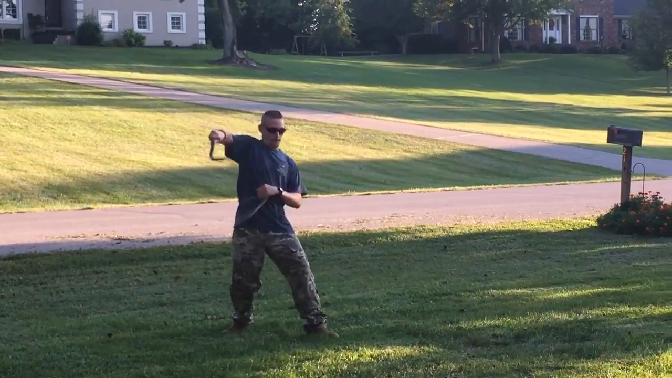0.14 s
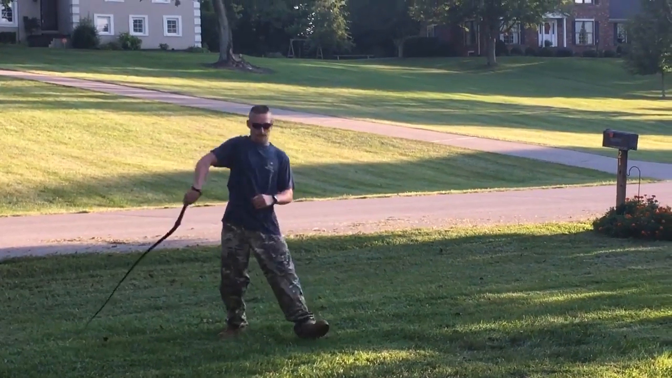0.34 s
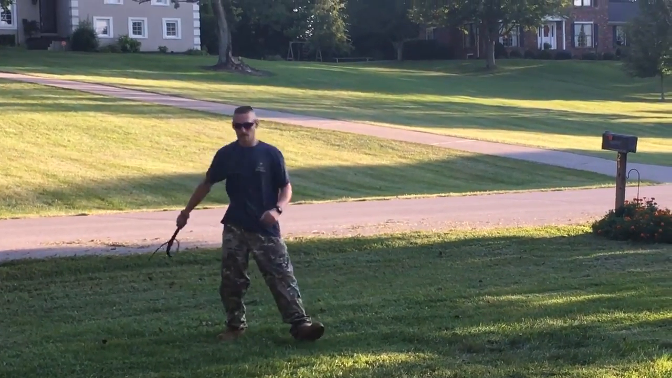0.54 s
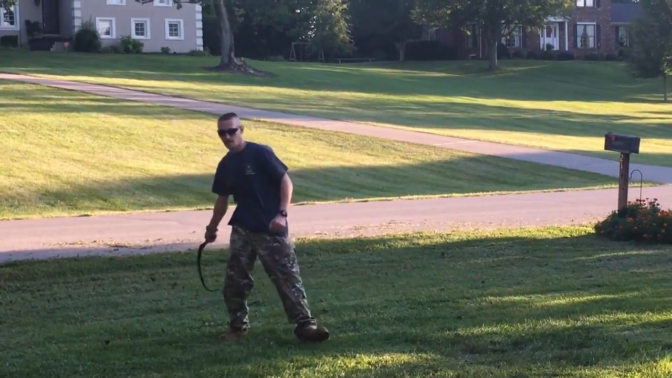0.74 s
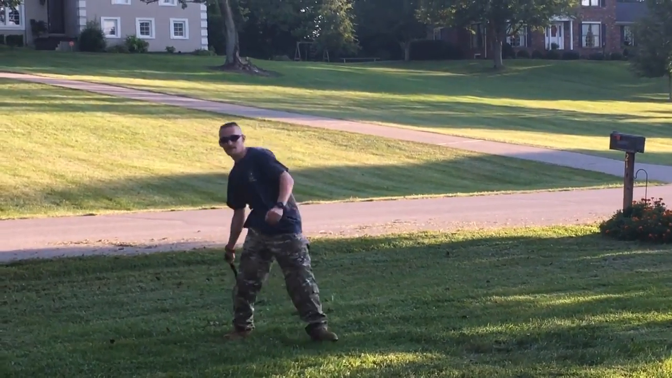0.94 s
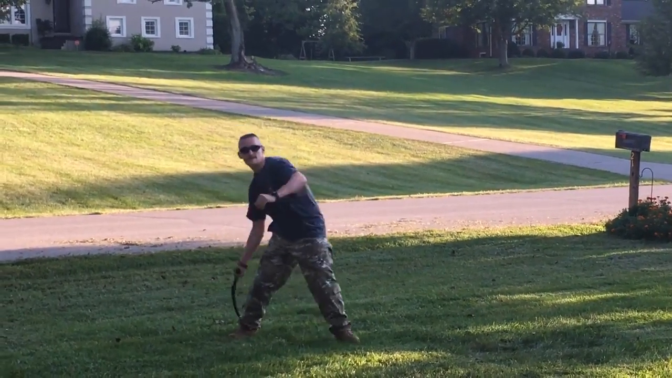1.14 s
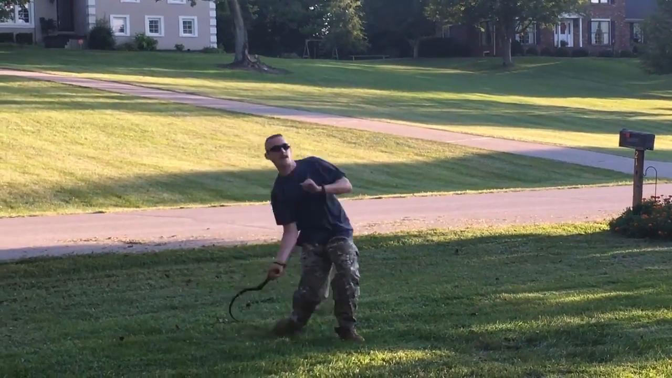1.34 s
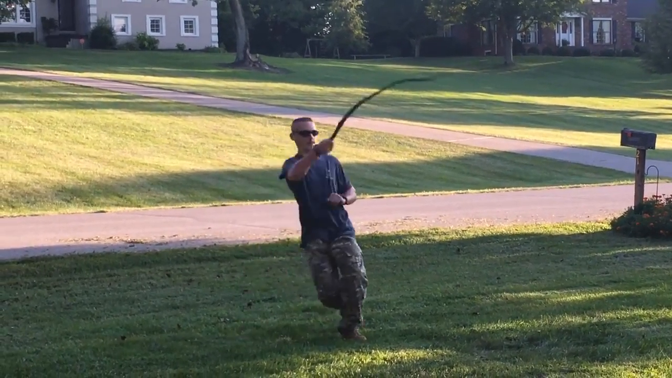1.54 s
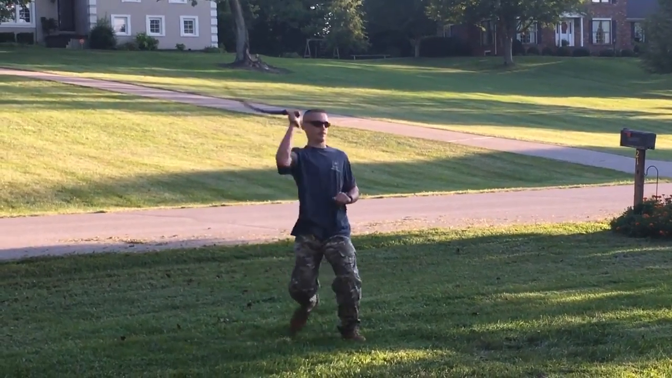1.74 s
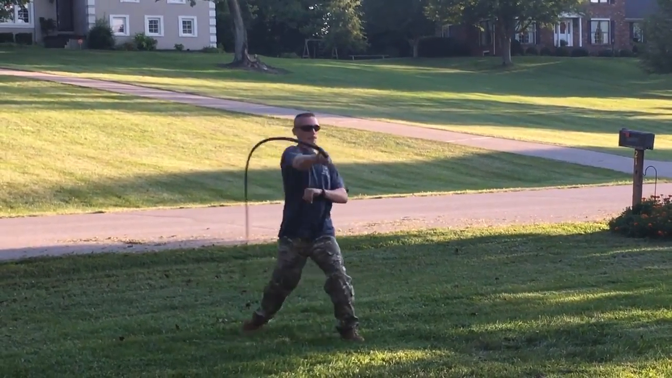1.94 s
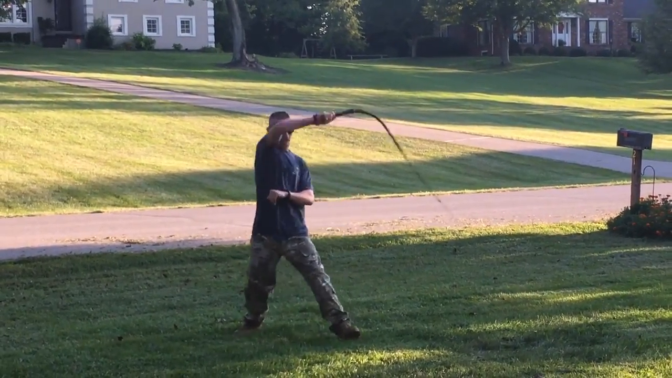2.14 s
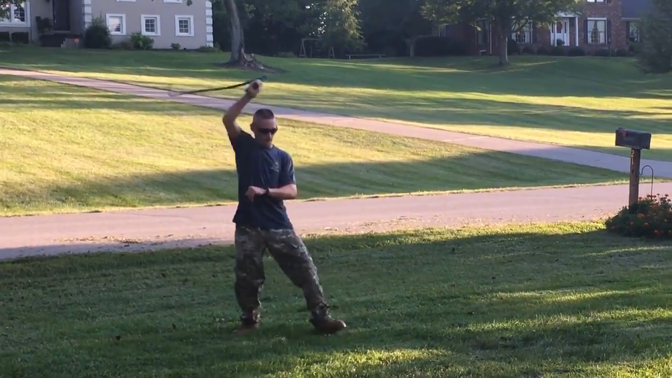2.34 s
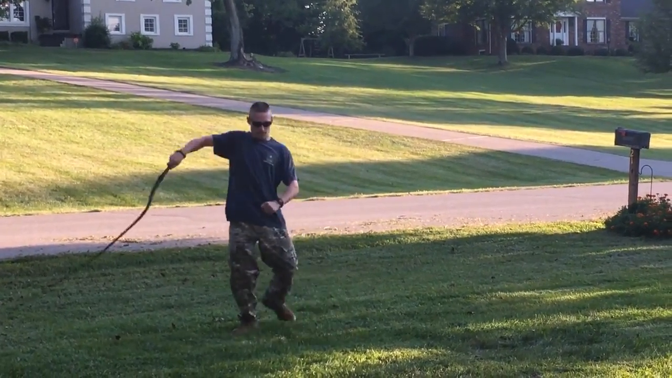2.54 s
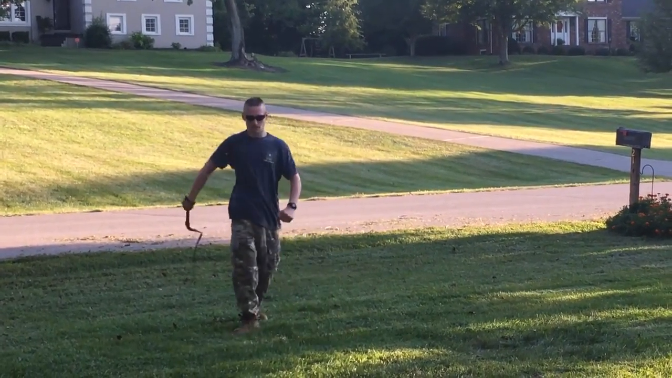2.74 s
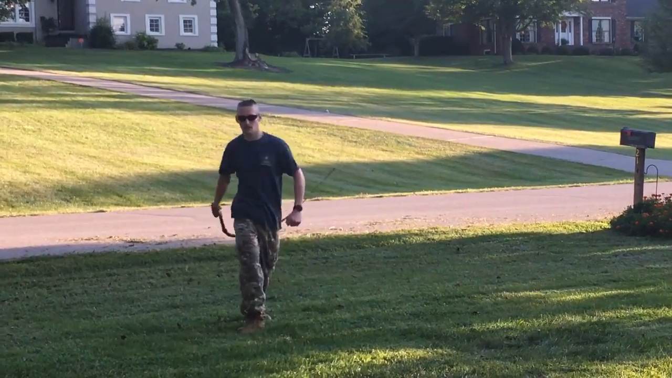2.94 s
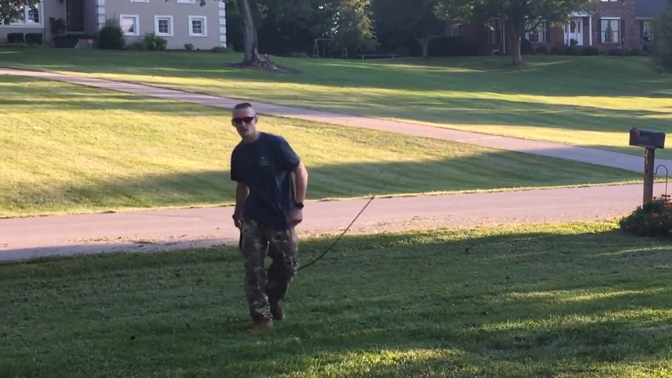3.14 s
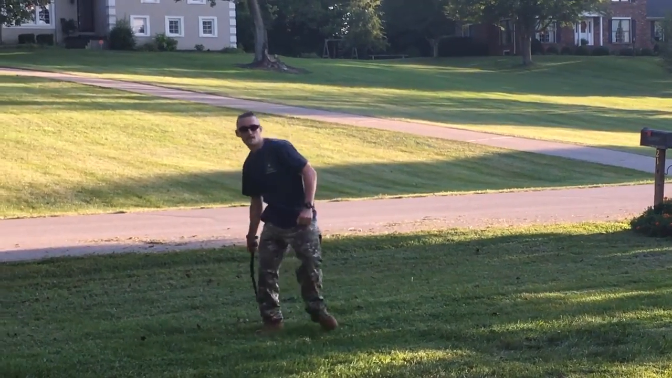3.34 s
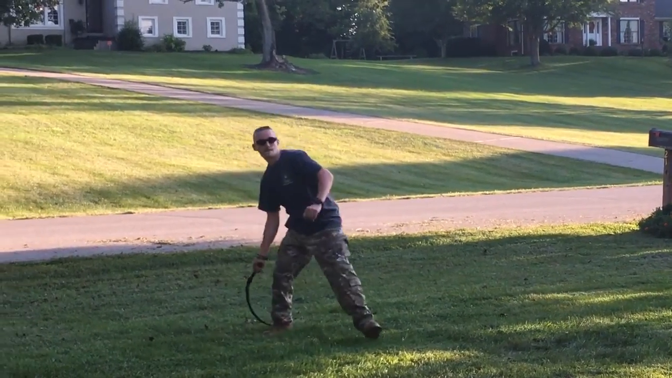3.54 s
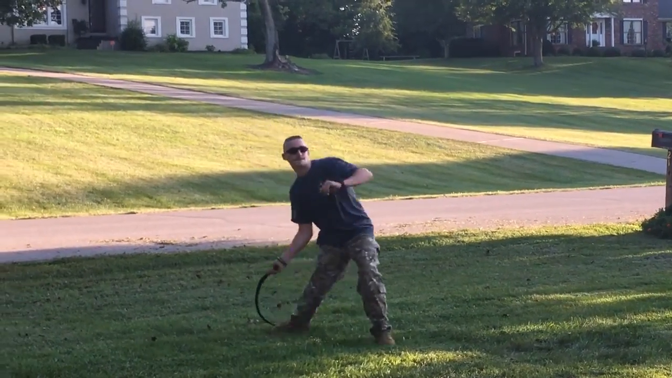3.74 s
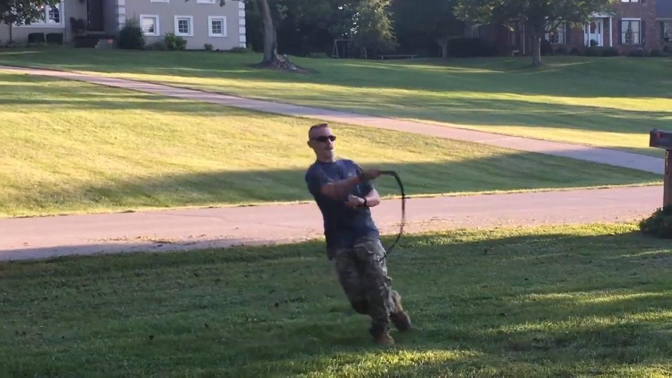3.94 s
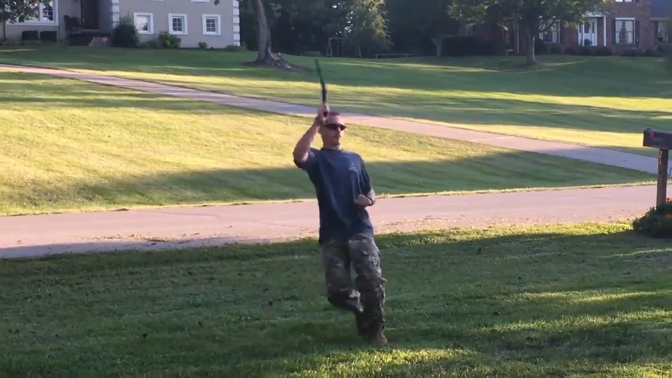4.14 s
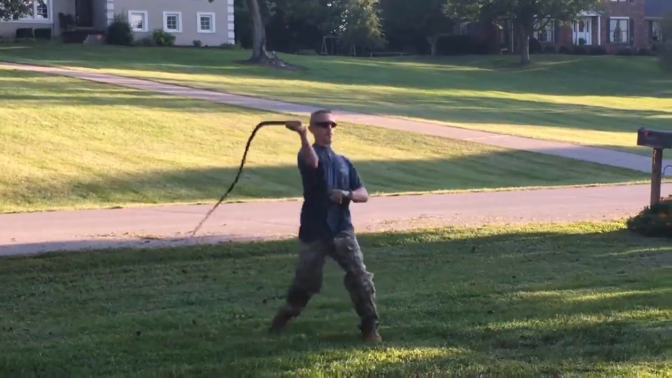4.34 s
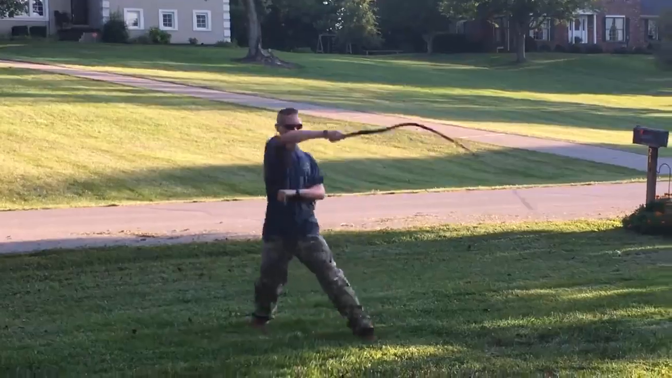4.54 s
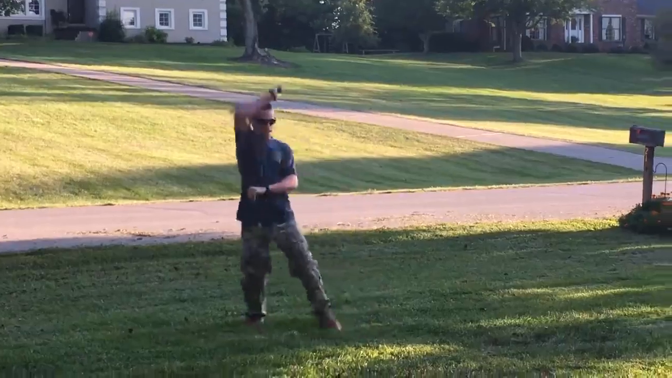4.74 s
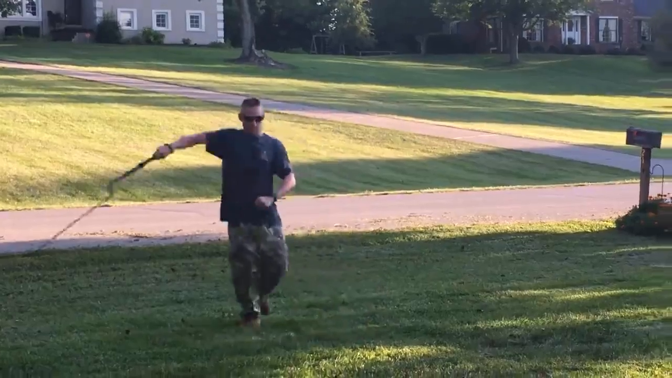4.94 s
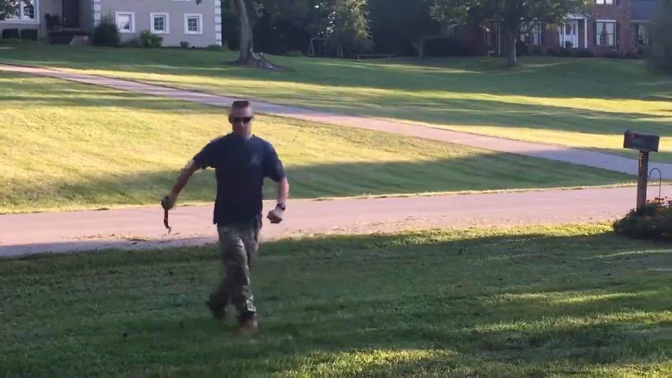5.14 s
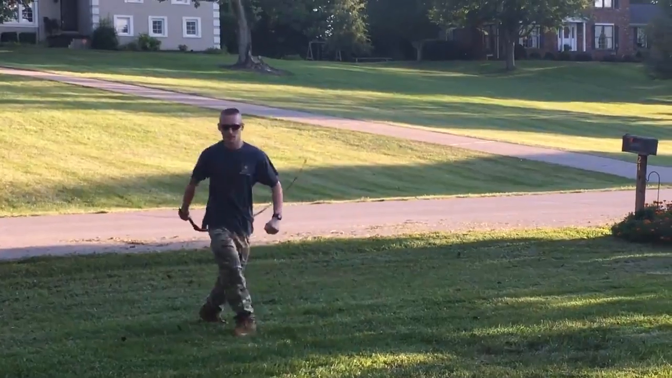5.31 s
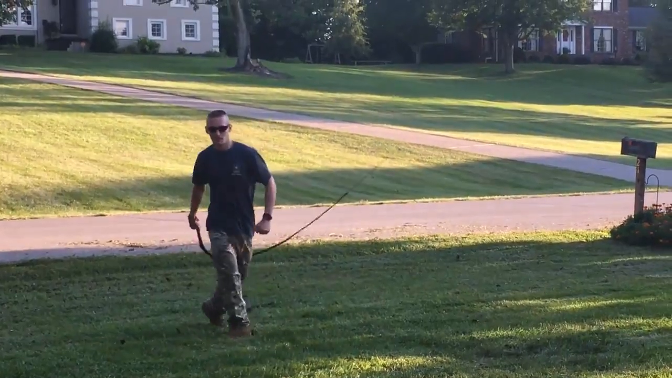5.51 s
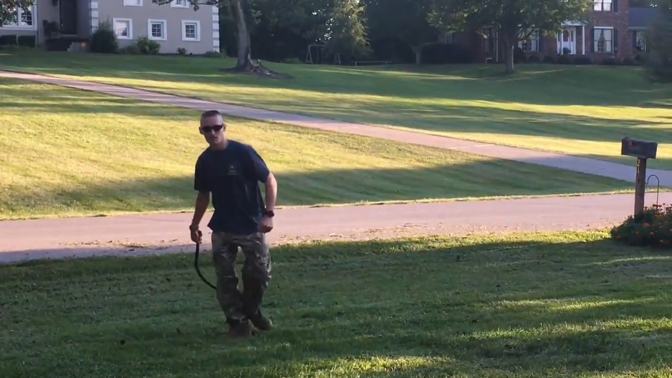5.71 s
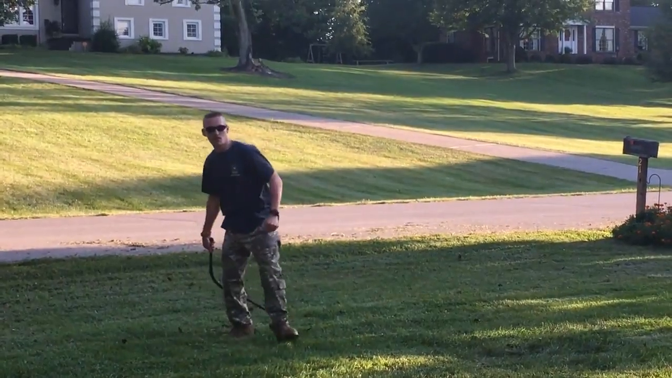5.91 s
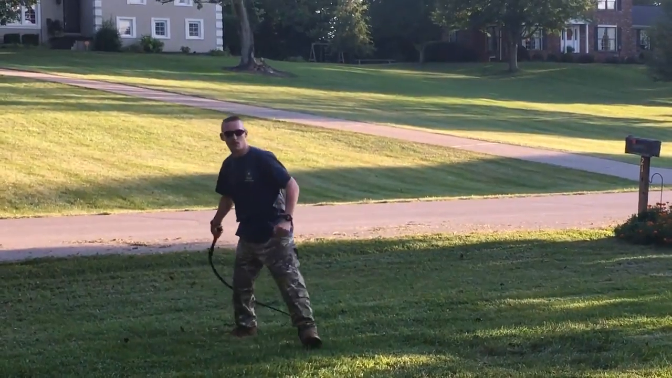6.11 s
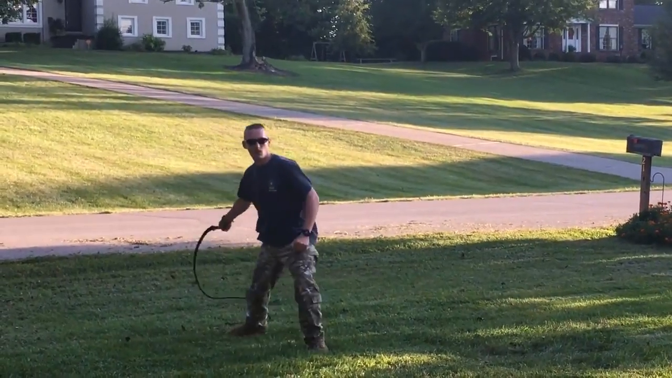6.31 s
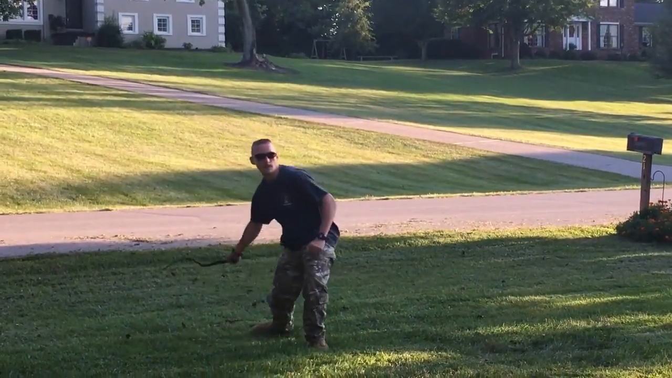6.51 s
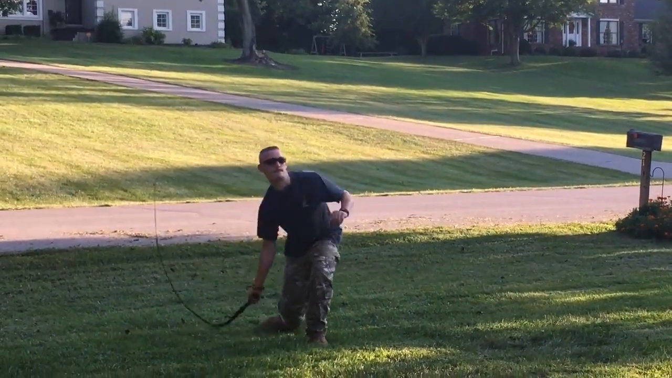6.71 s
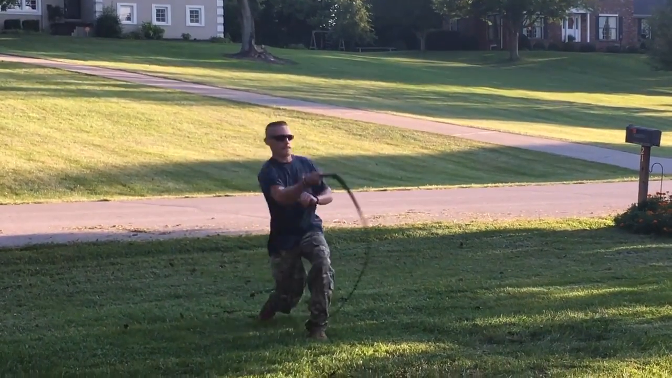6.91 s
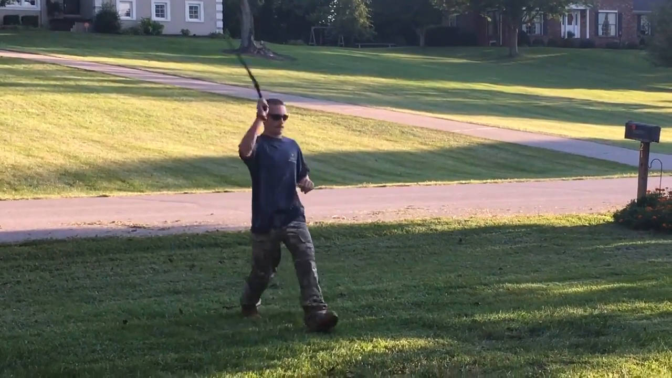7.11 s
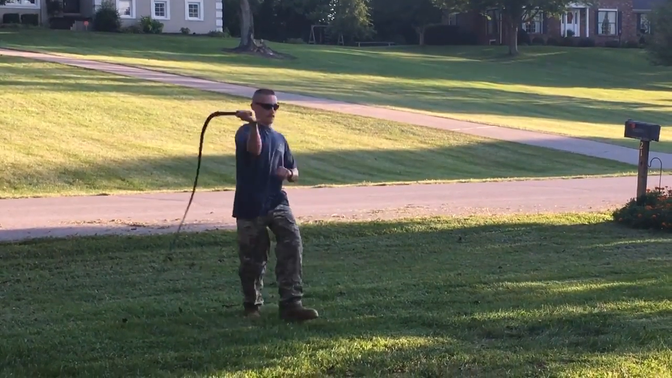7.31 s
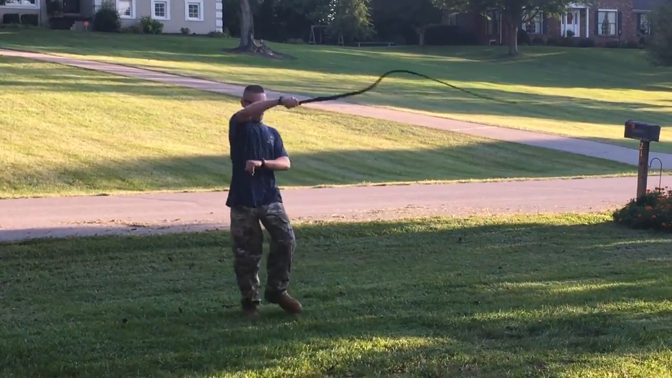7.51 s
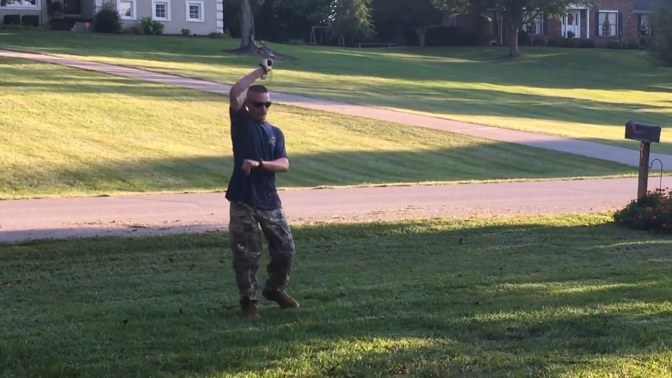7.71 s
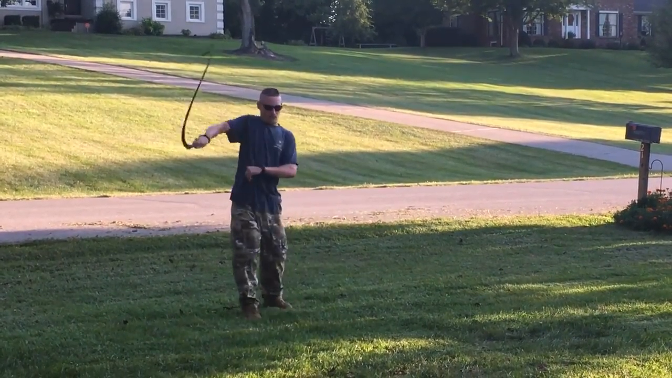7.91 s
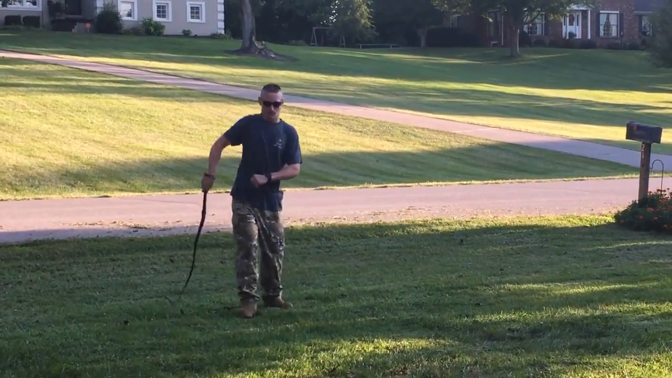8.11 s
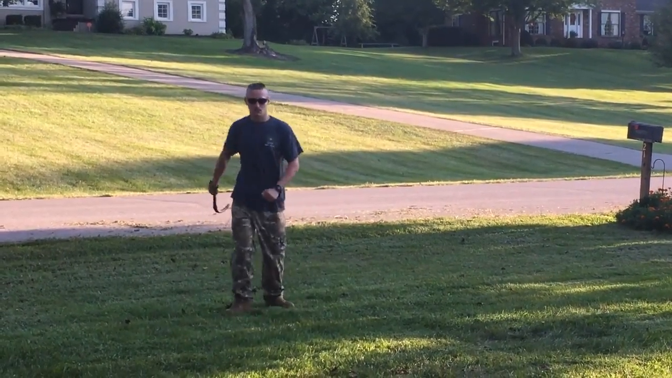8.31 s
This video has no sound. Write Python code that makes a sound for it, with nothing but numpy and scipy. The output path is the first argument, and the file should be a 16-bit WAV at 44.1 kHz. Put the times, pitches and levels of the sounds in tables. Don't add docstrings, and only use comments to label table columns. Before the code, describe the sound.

Short airy whistles swell into gunshot-like whip cracks, spaced about half a second apart in groups with pauses between. Hard echoes return from houses and trees, followed by a softer, duller tail across open ground. The cord brushes air and grass between groups. The overloaded microphone ducks the quiet bed of steady insects, near cricket chirps, distant motor and leaves, then lets it creep back.

```python
import sys
import numpy as np
from scipy import signal
from scipy.fft import rfft, irfft, next_fast_len
from scipy.io import wavfile
from scipy.ndimage import uniform_filter1d, map_coordinates

SR = 44100
rng = np.random.default_rng(int(sys.argv[2]) if len(sys.argv) > 2 else 0)


def volts_from_decibels(level):
    exponent = np.asarray(level, float) / 20
    return 10 ** exponent


def file_out(sig):
    cols = np.atleast_2d(sig).T
    lim = np.clip(cols, -1, 1)
    pcm = np.round(lim * 32767).astype(np.int16)
    wavfile.write(sys.argv[1], SR, pcm)


N = 368676
T = np.arange(N) / SR


def unit(x):
    return x / np.sqrt(np.mean(x ** 2) + 1e-20)


def along(points, hz):
    f, v = np.transpose(points)
    return np.interp(np.log(hz + 1), np.log(f + 1), v)


def filtered(x, response):
    m = next_fast_len(N + 8192)
    return irfft(rfft(x, m) * response(np.fft.rfftfreq(m, 1 / SR)), m)[:N]


def noise(response):
    return unit(filtered(rng.standard_normal(N), response))


def wobble(rate):
    knots = rng.standard_normal(int(N * rate / SR) + 4)
    return np.interp(T, T[::8], map_coordinates(knots, [T[::8] * rate]))


def add(track, s, piece):
    part = track[round(s * SR):][:len(piece)]
    part += piece[:len(part)]


def tent(t, arrive, hold, rise, fall):
    return -rise * np.maximum(arrive - t, 0) - fall * np.maximum(t - arrive - hold, 0)


# (time [s], shaft speed [Hz], firing tone level [dB])
ENGINE = [(0, 25.6, -43.5), (.6, 25.51, -43), (1.1, 25.43, -43.5), (1.45, 25.18, -49.5),
          (2.4, 25.38, -48.5), (3.2, 25.15, -57), (3.6, 25.17, -61), (3.95, 24.9, -53.5),
          (5.3, 24.93, -47.5), (5.8, 25.23, -40), (6.2, 25.05, -40), (6.6, 24.9, -42.5), (6.9, 25, -52),
          (7.3, 25.08, -53), (7.6, 25.1, -56), (7.8, 24.8, -44.5), (8.36, 25.3, -37)]
ORDERS_DB = {2: -56.5, 3: -59, 5: -56.5, 6: -61.5, 7: -60, 8: -65, 9: -68.5, 10: -70, 12: -69, 13: -73.5,
             16: -75}


def engine():
    s, shaft_hz, tone_db = np.transpose(ENGINE)
    speed_hz = np.interp(T, s, shaft_hz) * (1 + 0.0033 * wobble(9.1))
    turn = 2 * np.pi * np.cumsum(speed_hz) / SR
    out = volts_from_decibels(np.interp(T, s, tone_db) + 0.74 * wobble(3.5)) * np.sin(4 * turn)
    for k, db in ORDERS_DB.items():
        out += volts_from_decibels(db + 3 + 1.5 * wobble(2)) * np.sin(k * turn + rng.uniform(0, 2 * np.pi))
    return out


# (frequency [Hz], density [dB per Hz])
RUMBLE = [(15, -46), (28, -18), (42, -4), (58, 7), (85, -5.5), (130, -6), (230, -16), (420, -27),
          (700, -32), (1500, -120)]
# (time [s], level [dB])
RUMBLE_DB = [(0, -52), (1.5, -50), (3.1, -54), (3.2, -43), (3.5, -53.5), (4, -51), (5.6, -54.5), (7, -58),
             (8.36, -46.5)]
# (frequency [Hz], density [dB per Hz])
AIR = [(290, -26.5), (500, -2.5), (595, -7), (1380, -2), (4940, -13.5), (6230, -22.5), (6700, 0.5),
       (7420, -4), (8210, 4), (10400, -17), (16000, -20.5)]


def air():
    traffic_db = np.interp(T, *np.transpose(RUMBLE_DB)) + 1.3 * wobble(3.9)
    traffic = volts_from_decibels(traffic_db) * noise(lambda hz: volts_from_decibels(along(RUMBLE, hz)))
    leaves = volts_from_decibels(-62.0 + 0.52 * wobble(5.7)) * noise(lambda hz: volts_from_decibels(along(AIR, hz)))
    return traffic + leaves


# (first chirp [s], last chirp [s])
CHIRPS = [
    (.047, .047),
    (.443, 1.522),
    (1.945, 3),
    (3.0, 3.885),
    (4.285, 4.443),
    (5.41, 7.367),
    (7.74, 7.912),
    (8.29, 8.29),
]
CHIRP_GAP_S, CHIRP_S = .178, .081


def crickets():
    gate = np.zeros(N)
    t = np.arange(round(CHIRP_S * SR)) / SR
    wing_pulses = 0.39 + 0.55 * np.cos(np.pi * 47 * t - .6) ** 4
    for first, last in CHIRPS:
        for s in np.linspace(first, last, round((last - first) / CHIRP_GAP_S) + 1):
            add(gate, s, wing_pulses)
    wing = np.sin(2 * np.pi * np.cumsum(6870 + 70 * wobble(400)) / SR)
    near = volts_from_decibels(-51.0 + 1.1 * wobble(28)) * uniform_filter1d(gate, size=40) * wing

    def band(hz_mid, hz_wide):
        return noise(lambda hz: 1 / (1 + ((hz - hz_mid) / hz_wide) ** 4))

    chorus = volts_from_decibels(-63.5 + 2.5 * wobble(250) + 1.2 * wobble(23)) * band(hz_mid=8160, hz_wide=420)
    low_chorus = volts_from_decibels(-71.5 + 2.5 * wobble(40)) * band(hz_mid=6700, hz_wide=300)
    return near + chorus + low_chorus


# (frequency [Hz], density [dB per Hz])
ECHO_COLOUR = [(150, -44.5), (250, -6.5), (484, -10), (640, -7.5), (890, -9.5), (1040, -7.5), (1640, -3),
               (2440, -1), (3010, -2.5), (4050, 1), (11700, -23), (14700, -30.5), (16000, -35.5)]


def patter(hz_lo, hz_hi, spread_db):
    taps = rng.standard_normal(N) * volts_from_decibels(spread_db * wobble(900))

    def part(hz):
        edges = (1 + (hz_lo / (hz + 1)) ** 8) * (1 + (hz / hz_hi) ** 8)
        return volts_from_decibels(along(ECHO_COLOUR, hz)) / np.sqrt(edges)

    return unit(filtered(taps, part))


# (time [s], signed low-cut thump [full scale], crossover ring [dB], gain dip [dB])
CRACKS = [
    (0.218, -0.0038, -28.5, 3),
    (1.610, -0.55, -10, 19.5),
    (2.1182, 0.002, -42, 6.5),
    (2.577, 0.42, -15.5, 17),
    (4.0831, -0.4, -4.5, 20.5),
    (4.5741, -0.39, -32, 19.5),
    (5.0153, 0.27, -15, 23.5),
    (7.053, 0.024, -46, 1),
    (7.559, 0.0035, -25, 1.5),
    (8.0419, 0.56, -25, 21.5),
]
# (lawn [dB], houses [dB], far slopes [dB], low tilt [dB], top tilt [dB])
RETURNS = [(-12, -27.5, -41.5, -1, 2.2), (-14.5, -38, -44.5, 0, -1.5), (-12, -23.5, -41.5, 3, 3.5),
           (-10.5, -28.5, -36.5, 0, -0.5), (-15, -40, -43.5, 0.5, -3), (-13, -29.5, -39, 1, 2),
           (-12.5, -31, -36.5, 2, -1.5), (-30, -42, -62.5, 9, 1.5), (-21.5, -34, -55.5, 11, -1),
           (-11.5, -30.5, -36.5, -1, 2)]
HOUSES_LATE_S = [0.031, -0.0022, -.035, 0.0083, .004, -0.012, 0.0016, -0.0093, -.01, 0.00025]
# (level [dB], rise [dB/s], fall [dB/s])
LAWN = (.011, 0.0016), [(-12.5, -500, 649.5), (0.15, 449.5, 638.5), (-18, 61, 379)]
HOUSES = (0.058, 0.0098), [(-19.5, 30, 240), (-0.5, 310, 138.4), (-14.5, 37, 170)]
SLOPES = (0.34, 0.11), [(-15.5, 32.5, 23), (-1.24, 40, 42.4), (-27.5, -25.5, 63)]
# (time [s], rise [s], hold [s], 1-5 kHz level [dB], top level [dB])
SWEEPS = [(0.062, 0.15, 0.11, -53.5, -73), (1.5, 0.18, .1, -68, -64), (1.572, .09, .04, -54, -57),
          (2.078, .1, .04, -50.5, -71), (3.44, .05, .02, -70, -83), (3.9, .14, .12, -72, -65),
          (4.037, .08, 0.026, -48, -56), (4.53, 0.11, 0.035, -52, -68), (5.7, .04, .03, -68, -81),
          (5.828, .03, .02, -63, -77), (6.06, .12, .03, -57, -78), (6.14, .04, 0.029, -59.5, -70),
          (6.24, .05, 0.027, -65.5, -82), (6.45, .3, 0.21, -75, -79.5), (6.874, 0.071, .1, -78, -67),
          (6.999, 0.089, .05, -60.5, -59.5), (7.435, .15, .05, -78, -74), (8.004, .08, .04, -59, -71)]
SWEEP_RISE_DB, SWEEP_FALL_DB_S, SWEEP_LOW_DB = 21.5, 92, -5
MURMUR_DB = -64
SLOPES_DUCK, MURMUR_DUCK = 0.54, 0.83


def scatter(gain):
    power = np.full((3, N), 1e-10)  # low, 1-5 kHz, top
    for (s, *_), (*near_to_far, low, top), late in zip(CRACKS, RETURNS, HOUSES_LATE_S):
        reflectors = zip(near_to_far, (LAWN, HOUSES, SLOPES), (0, 0, SLOPES_DUCK), (0, late, 0))
        for db, (timing, bands), duck, lag in reflectors:
            span = slice(round(s * SR), round((s + .15 + 5 * timing[0]) * SR))
            since = T[span] - s - lag
            levels = [db + tilt + part_db + tent(since, *timing, rise, fall)
                      for tilt, (part_db, rise, fall) in zip((low, 0, top), bands)]
            power[:, span] += (volts_from_decibels(np.array(levels)) * gain[span] ** duck) ** 2
    for s, rise_s, hold, mid, top in SWEEPS:
        span = slice(max(round((s - .5) * SR), 0), round((s + .5) * SR))
        shape = tent(T[span], s, hold, SWEEP_RISE_DB / rise_s, SWEEP_FALL_DB_S)
        power[:, span] += volts_from_decibels(shape + np.array([[mid + SWEEP_LOW_DB], [mid], [top]])) ** 2
    power[0] += (volts_from_decibels(MURMUR_DB) * gain ** MURMUR_DUCK) ** 2
    low_db, mid_db, top_db = 10 * np.log10(power)
    treble_db = -0.5 + 0.48 * mid_db + 0.46 * top_db
    rustle_db = top_db - 3.5 + 0.35 * (top_db - mid_db)
    parts = [patter(170, 1245, spread_db=1.0), patter(1000, 3720, spread_db=1.54),
             patter(5800, 9300, spread_db=2.0), patter(12000, 19000, spread_db=0.5),
             patter(12500, 17000, spread_db=5.5)]
    levels_db = np.array([low_db, mid_db, treble_db, top_db, rustle_db])
    shared_db = .9 * wobble(60) + 1.2 * wobble(220)
    own_db = 1.1 * np.array([wobble(45) for _ in parts])
    return np.sum(volts_from_decibels(levels_db + shared_db + own_db) * parts, 0)


# (time [s], length [s], first pitch [Hz], last pitch [Hz], last level [dB])
SWELLS = [
    (.14, .075, 968, 1094, -42),
    (1.545, 0.038, 1280, 1430, -33),
    (1.56, .03, 3610, 3430, -45),
    (2.098, .02, 1702, 1418, -24.5),
    (4.04, 0.031, 2372, 1642, -27),
    (7.52, .037, 1038, 1940, -28),
]
# (time [s], length [s], first pitch [Hz], last pitch [Hz], top level [dB])
WHISTLES = [(4.018, 0.029, 1410, 2500, -24.5), (4.022, .02, 5700, 6600, -38), (7.07, .12, 880, 464, -42),
            (7.07, .13, 4200, 3790, -47), (7.512, .035, 3460, 3294, -52), (8.002, 0.021, 3630, 4130, -48),
            (1.12, .1, 594, 600, -56), (1.22, .09, 600, 600, -56), (1.13, 0.15, 447, 450, -57),
            (1.26, 0.18, 437, 412, -54.5), (5.52, 0.074, 430, 418, -49), (5.61, .08, 415, 400, -49),
            (5.93, 0.14, 295, 335, -49), (7.62, 0.074, 408, 395, -37), (7.73, 0.16, 404, 394, -52)]
SWELL_DB, TOP_AT, FADE_IN_DB, FADE_OUT_DB = 15.5, .33, 20, 17
SLOWING_S, SLOWING_LENGTH, SLOWING_DB, SLOWING_FALL_DB_S = 7.05, 0.33, -29.5, 105
TIP_HZ, TIP_TAU_S, CORD_HZ, CORD_TAU_S = 4200, .018, 1600, .28
LOOP_FIRST, LOOP_STEP, LOOP_DEPTH_DB = 0.139, 0.0863, 18


def cord_tones():
    for rows, top_at, fade_in_db in ((SWELLS, 1, SWELL_DB), (WHISTLES, TOP_AT, FADE_IN_DB)):
        for s, length, hz0, hz1, db in rows:
            u = np.linspace(0, 1, round(length * SR))
            shape = tent(u, top_at, 0, fade_in_db / top_at, FADE_OUT_DB / (1 - TOP_AT))
            yield s, hz0 * (hz1 / hz0) ** u, db + shape, 1
    t = np.arange(round(SLOWING_LENGTH * SR)) / SR
    loops = np.sin(np.pi * (np.sqrt(t) - LOOP_FIRST) / LOOP_STEP) ** 2
    loops *= np.minimum(t / 0.084, 1) ** 2
    hz = TIP_HZ * np.exp(-t / TIP_TAU_S) + CORD_HZ * np.exp(-t / CORD_TAU_S)
    yield SLOWING_S, hz, SLOWING_DB - SLOWING_FALL_DB_S * t - LOOP_DEPTH_DB * loops, 1.1


def whistles():
    out = np.zeros(N)
    tip_smear = wobble(500) + 1j * wobble(500)
    thick_smear = wobble(700) + 1j * wobble(700)
    for s, hz, db, blur in cord_tones():
        span = slice(round(s * SR), round(s * SR) + len(hz))
        turn = 2j * np.pi * np.cumsum(hz) / SR
        rough = blur * np.clip(hz / 1500 - .2, .08, 1.6)
        tone = (1 + rough * tip_smear[span]) * np.exp(turn)
        tone += 0.37 * rough * thick_smear[span] * np.exp(.75 * turn)
        out[span] += volts_from_decibels(db - 2) * tone.imag
    return out


def overload():
    out, t = np.zeros(N), np.arange(round(.07 * SR)) / SR
    turns = 44 * t + 1.54 * (1 - np.exp(-t / .0049))
    thump = np.sin(2 * np.pi * turns) * np.exp(-((t - .012) / 0.018) ** 2)
    thump *= 1 - 0.58 * np.exp(-(t / 0.0037) ** 3)
    ring = volts_from_decibels(-60 * t[::-1] / 0.033) * np.sin(2 * np.pi * 3180 * t)
    low_ring = .25 * volts_from_decibels(-60 * np.abs(t - .035) / .03) * np.sin(2 * np.pi * 450 * t)
    for s, size, ring_db, *_ in CRACKS:
        add(out, s - .0025, size * thump)
        add(out, s - .07, volts_from_decibels(ring_db) * ring)
        add(out, s - .036, size * low_ring)
    return out


def front(width_ms):
    u = (np.arange(round(.004 * SR)) / SR - .002) / (width_ms / 1000)
    return np.where(u < 0, 2.2 * u * np.exp(-u ** 2), 1.09 * u * np.exp(-(0.5 * u) ** 2))


# (level [dB], lead [s])
LEAD_INS = [(-31.5, .012), (-23, .022), (-30, 0.0068), (-29, 0.024), (-25.5, .024), (-27, .018), (-30, .024),
            (-42, .018), (-31, .014), (-31, 0.025)]
# (time [s], peak [dB], width [ms])
SHOCKS = [(0.2163, -4.5, 0.18), (0.2208, -7, 0.14), (1.6103, -2.5, 0.14), (2.1174, -6, 0.048),
          (2.1205, -13, .08), (2.1219, -2, 0.055), (2.123, -10.5, .1), (2.5763, 3.5, 0.086),
          (2.5790, 2, 0.048), (4.0862, -0.5, 0.066), (4.5755, -1, 0.092), (5.015, -9.5, .12),
          (5.0165, -0.5, 0.063), (7.0515, -9.5, 0.04), (7.0560, -18.5, 0.59), (7.561, 0.5, 0.083),
          (7.563, 0.5, 0.096), (8.0410, 1, 0.11), (8.0424, -4, 0.078)]
# (time [s], peak [dB], centre [Hz])
ECHOES = [(0.2635, -8, 4200), (0.2979, -16.5, 3000), (0.322, -19, 3900), (0.331, -20, 4200),
          (0.3481, -17, 3930), (0.3661, -23, 2540), (0.555, -34, 1500), (0.7576, -32, 1840),
          (0.768, -34, 1600), (1.6909, -24.5, 3190), (2.071, -36, 1974), (2.2028, -20, 2400),
          (2.6228, -15.5, 3430), (2.6575, -8.5, 3470), (2.711, -30, 3000), (2.727, -30, 2600),
          (3.038, -28.5, 1900), (3.128, -21.5, 2000), (4.1638, -24.5, 2150), (4.657, -18, 2290),
          (5.062, -22, 4380), (5.0955, -11, 3300), (5.436, -31, 1970), (5.4759, -30, 1780),
          (5.5649, -24.5, 2020), (6.6656, -45, 6500), (6.6657, -47, 2000), (7.445, -49, 5000),
          (7.642, -29, 2380), (8.122, -15.5, 2310)]


def whip():
    out, lead_in, fray = np.zeros(N), np.zeros(N), np.zeros(N)
    t = np.arange(round(.04 * SR)) / SR
    for (s, *_), (lead_in_db, lead) in zip(CRACKS, LEAD_INS):
        before = t[:round(lead * SR)][::-1]
        add(lead_in, s - lead, volts_from_decibels(lead_in_db - 5.5) * (1 + 4.0 * np.exp(-before / 0.0023)))
    for s, db, width_ms in SHOCKS:
        add(out, s - .002, volts_from_decibels(db) * front(width_ms))
        add(fray, s, volts_from_decibels(db - 12 - 60 * t / 0.0069))
    for s, db, hz in ECHOES:
        splash = volts_from_decibels(-60 * (t - .002) / .022) * np.clip((t - .0012) / .0012, 0, 1)
        slap = .7 * rng.standard_normal(len(t)) * splash
        add(slap, 0, front(140 / hz))
        band = signal.butter(2, [hz / 1.6, hz * 1.45], "bandpass", fs=SR, output="sos")
        slap = signal.sosfilt(band, slap)
        slap = slap + (hz / 16000) ** 2 * np.gradient(slap)
        add(out, s - .001, volts_from_decibels(db + 3) * slap / np.abs(slap).max())
    dull, bright = patter(300, 2200, spread_db=3.5), patter(2400, 9000, spread_db=3.5)
    frayed = fray * patter(1800, 17000, spread_db=1.0)
    return out + lead_in * (dull + volts_from_decibels(-7.5) * bright) + frayed


def ducking():
    dips = [dip_db * (T > s) * np.exp(-(np.abs(T - s) / 0.54) ** 2) for s, _, _, dip_db in CRACKS]
    return volts_from_decibels(-np.max(dips, 0))


def scene():
    gain = ducking()
    surroundings = gain * (engine() + air()) + gain ** 0.51 * crickets()
    return (surroundings + scatter(gain) + whistles() + overload() + whip())[None]


def roll_off(x):
    return signal.sosfilt(signal.butter(12, 16510, fs=SR, output="sos"), x)


def record(dry):
    clipped = dry[0] / (1 + np.abs(dry[0] / .95) ** 10) ** (1 / 10)
    limited = filtered(clipped, lambda hz: 1 / (1 + (hz / 15780) ** 240))
    return roll_off(limited[None])


dry = scene()
out = record(dry)
file_out(out)
```